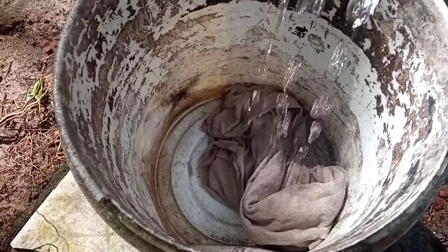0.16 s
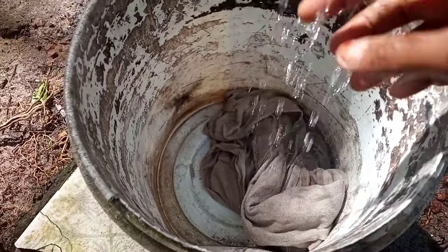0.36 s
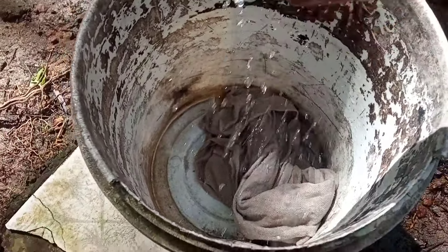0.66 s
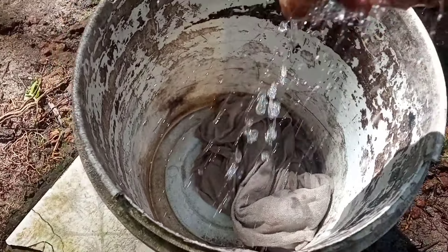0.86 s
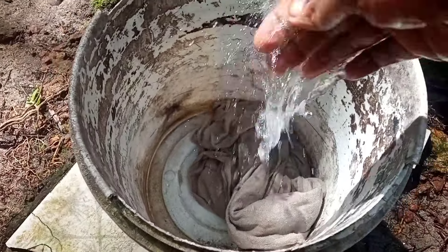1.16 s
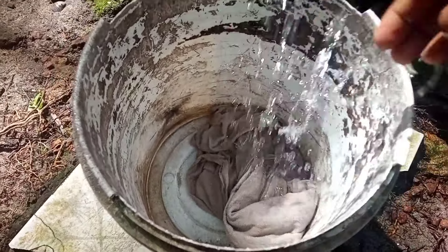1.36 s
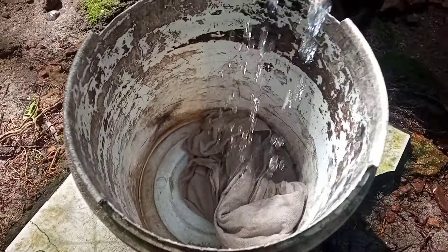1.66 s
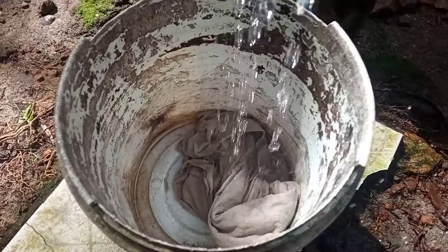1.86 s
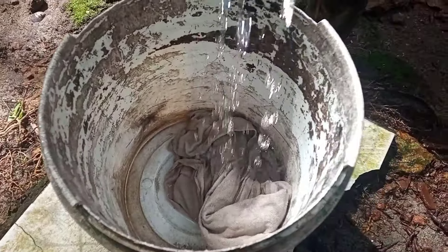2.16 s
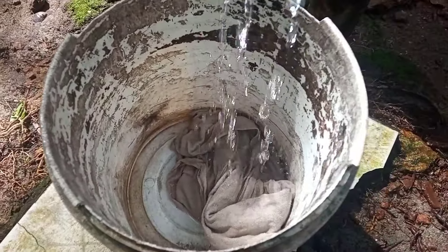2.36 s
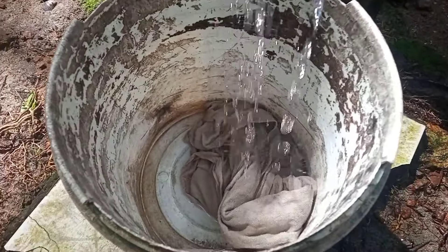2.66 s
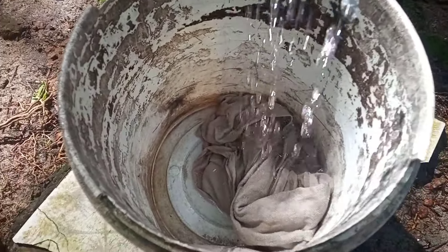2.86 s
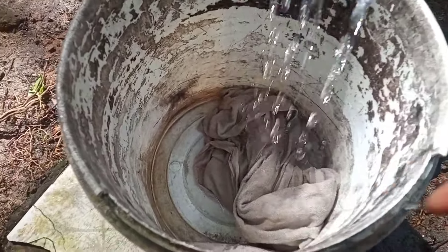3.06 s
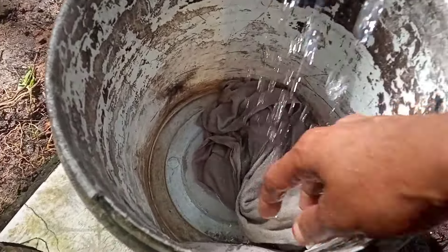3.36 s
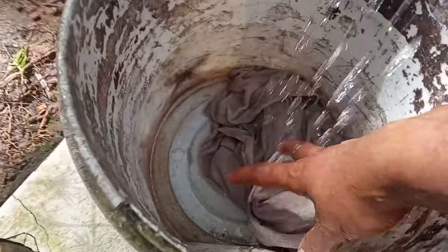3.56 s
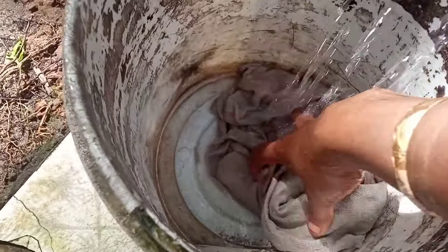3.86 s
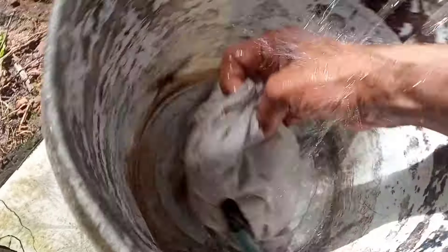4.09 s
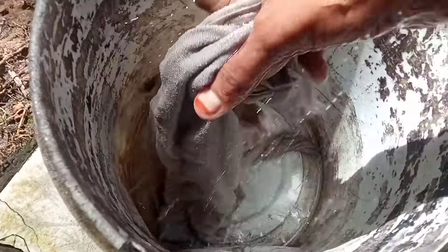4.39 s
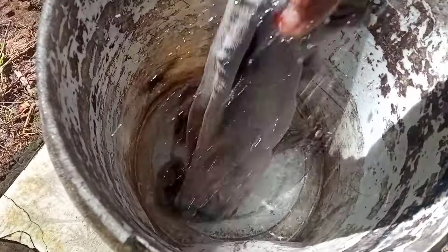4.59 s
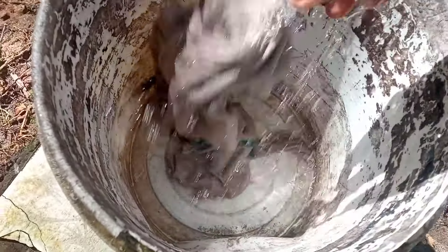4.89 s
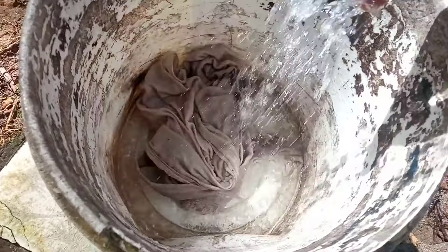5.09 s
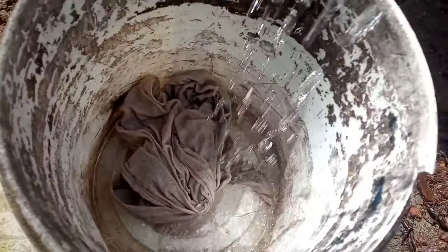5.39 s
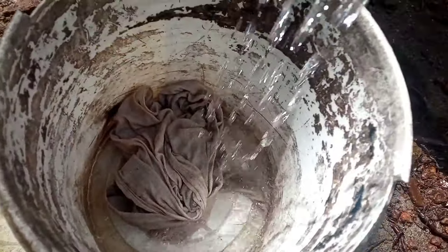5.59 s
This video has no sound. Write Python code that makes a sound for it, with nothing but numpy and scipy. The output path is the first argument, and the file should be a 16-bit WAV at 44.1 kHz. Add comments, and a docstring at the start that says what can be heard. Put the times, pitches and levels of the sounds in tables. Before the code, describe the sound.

Close bright water drops patter over cloth in a hollow bucket, briefly cut off, then wet smacks, thumps and sloshing, ending in gurgling splashes.

```python
"""Water falling on cloths in a metal bucket

A broken stream falls close by, outdoors: drops tick and spatter over a soft patter. A hand briefly cuts it,
then grabs and lifts the wet cloth, which slaps and makes the bucket's air boom. The cloth drops back and the
stream bubbles into the puddle. Tiny random impacts make the rain, rising notes the drops and bubbles,
short noise bursts the slaps and snaps; echoes and resonances make the bucket."""
import sys
import numpy as np
from scipy import signal
from scipy.fft import rfft, irfft
from scipy.io import wavfile
from scipy.ndimage import uniform_filter1d

SR = 44100
rng = np.random.default_rng(int(sys.argv[2]) if len(sys.argv) > 2 else 0)


def inscribe(sig):
    """Save sig as 16-bit PCM at rate SR to the path in sys.argv[1].

    A 1-D sig is mono; a 2-D sig holds one channel per row.
    Samples are clipped to [-1, 1] before scaling.
    """
    pcm = np.round(np.clip(np.atleast_2d(sig).T, -1, 1) * 32767)
    wavfile.write(sys.argv[1], SR, pcm.astype(np.int16))


N = 253134
USUAL_FLOW_DB = -49   # the flow that all changes of the stream are counted from


def from_db(db):
    """Turn decibels into a factor."""
    return 10 ** (np.asarray(db) / 20)


def rms_one(x):
    """Scale to an average strength (rms) of 1."""
    return x / np.sqrt(np.mean(x ** 2) + 1e-20)


def evened(x, size=2600):
    """Hold the running rms near 1 while the single grains stay; size is in samples."""
    power = uniform_filter1d(uniform_filter1d(x ** 2, size), size // 2)
    return x / np.sqrt(np.maximum(power, 0) + 1e-3 * np.mean(x ** 2))


def in_time(rows):
    """Join (seconds, dB) points by straight lines, giving a level at every sample."""
    s, db = np.transpose(rows)
    return np.interp(np.arange(N) / SR, s, db)


def swells(rows):
    """Sum of smooth humps, from rows of (middle in s, length at half height in s, height)."""
    t = np.arange(N) / SR
    return sum(height * np.cos(np.pi / 2 * np.clip((t - s) / length, -1, 1)) ** 2
               for s, length, height in rows)


def loudness_swells(rows):
    """Humps whose heights are given in dB."""
    return swells([(s, length, from_db(db)) for s, length, db in rows])


def drift(rate):
    """Slow random wandering with spread 1: smoothed noise, made at every 40th sample and joined by lines."""
    step = 40
    r = np.exp(-2 * np.pi * rate * step / SR)
    noise = rng.standard_normal(N // step + 2002)
    slow = signal.lfilter([1], [1, -2 * r, r * r], noise)[2000:]   # leave out the filter's start
    return np.interp(np.arange(N) / step, np.arange(len(slow)), rms_one(slow))


def coloured(x, spectrum):
    """Filter that follows a spectrum of (Hz, dB) points and answers each impact without delay."""
    size = 4096
    hz, db = np.transpose(spectrum)
    bins_hz = np.fft.rfftfreq(size, 1 / SR)
    gain = from_db(np.interp(np.log(bins_hz + 1), np.log(hz), db))
    # folding the cepstrum forward in time gives the minimum-phase filter
    cepstrum = irfft(np.log(gain))
    cepstrum[1:size // 2] *= 2
    cepstrum[size // 2 + 1:] = 0
    return signal.oaconvolve(x, irfft(np.exp(rfft(cepstrum))))[:N]


def resonance(x, hz, width_hz):
    """Two-pole resonance with gain 1 on top."""
    r = np.exp(-np.pi * width_hz / SR)
    forward = np.array([1, 0, -1]) * (1 - r * r) / 2
    feedback = [1, -2 * r * np.cos(2 * np.pi * hz / SR), r * r]
    return signal.lfilter(forward, feedback, x + 1e-18)


def band_noise(low_hz, high_hz, size):
    """Noise between two edges, rms 1."""
    band = signal.butter(2, [low_hz, high_hz], "band", fs=SR, output="sos")
    return rms_one(signal.sosfilt(band, rng.standard_normal(size)))


def hiss(hz, width_hz):
    """Smoothly flowing water: a soft band of noise, rms 1."""
    once = resonance(rng.standard_normal(N), hz, width_hz)
    return rms_one(resonance(once, hz, width_hz))


def add(out, s, sound):
    """Mix a sound in from time s on."""
    i = int(np.clip(s * SR, 0, N - 1))
    out[i:i + len(sound)] += sound[:N - i]


def impacts(per_s, spread_db, clump_db):
    """Random tiny impacts, many weak and a few strong, arriving in clumps as the stream breaks up."""
    sizes = from_db(spread_db * np.minimum(rng.exponential(1, N), 4)) * rng.choice([-1, 1], N)
    happens = rng.random(N) < per_s / SR
    return sizes * happens * from_db(clump_db * drift(114))


def chirp(hz, swell, glide):
    """A bubble's note: loudest, at height 1, after swell seconds; rises in pitch as it nears the surface."""
    u = np.arange(int(4 * swell * SR) + 2) / (swell * SR)
    pitch = hz * (1 + glide * np.tanh(u - 1))
    envelope = (u * np.exp(1 - u)) ** 5
    return envelope * np.sin(2 * np.pi * (np.cumsum(pitch) / SR + rng.random()))


def bubble_swarm(per_s, low_hz, high_hz, cycles, glide, spread_db):
    """Small bubbles at random times, with pitches spread between two limits."""
    out = np.zeros(N)
    for when, pitch, size in rng.random((int(per_s * N / SR), 3)):
        hz = low_hz * (high_hz / low_hz) ** pitch
        loudness = from_db(-spread_db * np.log(size + .02))
        add(out, when * N / SR, loudness * chirp(hz, cycles / hz, glide))
    return evened(out)


def controls():
    """The flow in dB as it reaches spray, bottom and puddle, with its brief changes and obstacles."""
    # Strength of the stream, as its fine spray. Each row: time in seconds, level in dB.
    flow_curve = [(0, -49.5), (1.8, -50.5), (2.8, -47), (3.25, -46.5), (3.5, -44), (4.1, -46.5),
                  (4.85, -51), (5.25, -44), (5.74, -45.5)]
    # Gurgle of the puddle that gathers and is laid bare. Each row: time in seconds, level in dB.
    puddle_curve = [(0, -56.5), (2.4, -61), (3.15, -57.5), (3.7, -55.5), (3.93, -47.5), (4.3, -49),
                    (5.05, -51), (5.3, -50), (5.74, -47)]
    # The stream breaks off, or a hand or the lifted cloth gets in its way. Each row: start in seconds,
    # end in seconds, loss of spray in dB, loss at the bottom in dB, loss of gurgle in dB (minus is a gain).
    blocks = [(0.567, 0.87, 0, 14, 6), (0.926, 1.094, 15.5, 25, 12), (1.112, 1.24, 2.5, 15, 3.5),
              (1.826, 1.885, 3.5, 0, 4), (2.322, 2.34, 8, 4, 0), (2.52, 2.554, 13, 2, 17),
              (2.98, 3.02, 0, 2.5, 2), (3.064, 3.1, 4.5, 0.5, 3), (3.745, 3.826, 11, 12, -10.5),
              (4.222, 4.541, 13, 18, 11), (4.53, 4.678, 2, 15.5, 11), (4.697, 4.803, 13, 12, 19),
              (5.034, 5.098, 4, 4.5, 2)]
    # The stream briefly swells or weakens. Each row: middle in seconds, length in seconds,
    # change in dB (minus is a loss).
    brief_changes = [(.89, 0.019, -2), (1.41, 0.11, 3.5), (4.968, 0.06, 10.5)]
    edge_s, surge_db, surge_rate = 0.036, 2, 14.6   # the stream wanders and pulses, some times a second
    t = np.arange(N) / SR
    surge = surge_db * np.clip(drift(surge_rate), -2, 2)
    change = np.zeros((3, N)) + swells(brief_changes) + surge
    for start, end, *losses in blocks:
        inside = np.clip(np.minimum(t - start, end - t) / edge_s + .5, 0, 1)
        change -= np.outer(losses, inside)
    spray_change_db, bottom_change_db, gurgle_change_db = change
    flow_db = in_time(flow_curve) - USUAL_FLOW_DB
    return flow_db, in_time(puddle_curve) + gurgle_change_db, spray_change_db, bottom_change_db


def stream(flow_db, gurgle_db, spray_change_db, bottom_change_db):
    """Each part of the stream is a rain of tiny impacts; all but the patter add the small bubbles they trap."""
    # Colours of spray, patter on cloth, gurgle and splatter. Each row: frequency in Hz, level in dB per Hz.
    spray_colour = [(300, -80), (2000, -32), (3500, -9.5), (4700, -4.5), (6600, -0.5), (8500, 0),
                    (10500, -8), (13000, -11), (16000, -10)]
    patter_colour = [(40, -14.5), (80, -22), (120, -13.5), (170, -23.5), (300, 0), (370, -4), (520, 2.5),
                     (750, -5.5), (1200, -10.5), (2400, -30.5)]
    gurgle_colour = [(200, -57), (480, -11.5), (720, 3.5), (950, -2), (1300, 2), (1700, -4.5), (2300, -6.5),
                     (4000, -20.5), (12000, -50)]
    splatter_colour = [(300, -49), (1100, -11.5), (2100, 0), (2700, -0.5), (3400, 7), (4300, -0.5),
                       (6000, -1), (10000, -9), (16000, -24)]
    # Splatter off the wet wall. Each row: time in seconds, level in dB.
    wall_curve = [(0, -62.5), (2.5, -61.5), (3.2, -51.5), (3.55, -47.5), (4.3, -53.5), (4.9, -53.5),
                  (5.4, -51), (5.74, -42.5)]
    # Water splatters off the hand. Each row: middle in seconds, length in seconds, level in dB.
    hand_splatters = [(0.594, 0.03, -47), (0.683, 0.03, -42.5), (.755, .04, -52), (1.413, 0.031, -50),
                      (3.44, 0.036, -50), (5.23, 0.11, -48)]
    usual_patter_db, patter_follows = -56, 0.36   # at the usual flow; share of the flow's swing

    spray_db = USUAL_FLOW_DB + flow_db + spray_change_db
    patter_db = usual_patter_db + patter_follows * flow_db + bottom_change_db
    splatter = from_db(in_time(wall_curve) + spray_change_db) + loudness_swells(hand_splatters)
    blobs = from_db(4.0 * np.clip(drift(65), -2, 2))   # the stream arrives in separate blobs

    ticks = evened(coloured(blobs * impacts(per_s=6500, spread_db=7.0, clump_db=2.0), spray_colour))
    fizz = bubble_swarm(per_s=480, low_hz=4660, high_hz=7700, cycles=5.5, glide=0.14, spread_db=4.5)
    prickle = bubble_swarm(per_s=400, low_hz=8180, high_hz=13860, cycles=6.6, glide=0.068, spread_db=10.5)
    spray = (from_db(-1.5) * ticks + from_db(-1.7) * evened(blobs * fizz)
             + from_db(-7.5) * evened(blobs * prickle))

    patter = evened(coloured(impacts(per_s=2500, spread_db=3.0, clump_db=3.5), patter_colour))

    churn_hits = np.sqrt(blobs) * impacts(per_s=2500, spread_db=3.0, clump_db=4.5)
    churn = evened(coloured(churn_hits, gurgle_colour))
    bubbles = bubble_swarm(per_s=200, low_hz=736, high_hz=1930, cycles=3.94, glide=0.13, spread_db=5.5)
    gurgle = from_db(-2.5) * churn + from_db(-6.5) * bubbles

    splats = evened(coloured(blobs * impacts(per_s=2500, spread_db=4.5, clump_db=6.0), splatter_colour))
    plinks = bubble_swarm(per_s=220, low_hz=2117, high_hz=4450, cycles=6.6, glide=0.14, spread_db=1.5)
    splashes = from_db(-3.5) * splats + from_db(-5.5) * evened(blobs * plinks)
    return (from_db(spray_db) * spray + from_db(patter_db) * patter
            + from_db(gurgle_db) * gurgle + splatter * splashes)


def drops(rows, cycles=2.9, crack_db=-12.5):
    """Each drop gives a sharp crack and a tick a few cycles long, in a little burst of smaller droplets."""
    # The crack of a drop. Each row: frequency in Hz, level in dB per Hz.
    crack_colour = [(100, -25), (500, -38), (2000, -18), (8000, 7), (12000, -6.5), (16000, -8)]
    glide, hardening, typical_db = 0.14, 0.39, -26
    count, spatter_s, lead_s, scatter, spatter_db = 6, .0012, .0014, 0.28, -9.0
    out, cracks = np.zeros(N), np.zeros(N)
    for s, db, hz, rest_db in rows:
        swell = cycles / hz
        add(out, s - swell, from_db(db) * chirp(hz, swell, glide))
        hard_db = db + crack_db + hardening * (db - typical_db)   # fast drops crack out of proportion
        add(cracks, s, from_db(hard_db) * rms_one(rng.standard_normal(16)) * np.hanning(16))
        lateness = rng.gamma(2, spatter_s, count)
        detunings = rng.normal(0, scatter, count)
        for late, detune in zip(lateness, detunings):
            droplet = chirp(min(hz * np.exp(detune), SR / 5), swell, glide)
            add(out, s - lead_s + late, from_db(db + rest_db + spatter_db) * droplet)
    return out + coloured(cracks, crack_colour)


def loudest_drops():
    """The drops that stand out, each at its own time."""
    # Each row: time in seconds, peak of the tick in dB, pitch in Hz, spatter against the drop in dB
    # (before the trim that all spatter shares).
    loud_rows = [(0.1235, -31, 7350, 6.5), (0.1858, -20, 5800, -14), (0.3103, -24.5, 5900, -2),
                 (0.3863, -32, 5940, 4), (0.4725, -13, 5710, -2), (0.48, -27, 6400, -8),
                 (0.4945, -23, 6800, -6), (0.5378, -20.5, 6100, -5), (0.613, -21.5, 8800, -14),
                 (0.6466, -25, 7400, -7), (0.702, -27, 6800, 0), (0.7146, -27, 5700, -10),
                 (0.7662, -28.5, 3420, -14), (0.7868, -33, 5300, -6), (0.81, -24.5, 6000, 2),
                 (0.8348, -37, 5200, 3), (0.8737, -17, 5660, -5), (0.8795, -28, 5400, -10),
                 (0.901, -27, 5900, -8), (0.9047, -23, 6040, -15), (0.9232, -33, 5800, -10),
                 (0.9305, -30, 5300, -13), (0.947, -23.5, 5530, 1), (0.968, -47, 4200, -6),
                 (0.982, -32.5, 7900, -3), (0.993, -45, 4200, -4), (1.02, -50, 3400, -4),
                 (1.049, -49, 5200, -6), (1.1094, -35.5, 3430, 4), (1.151, -43, 2630, -4),
                 (1.1788, -36.5, 5270, 12.5), (1.2662, -19.5, 6150, -20), (1.3787, -17.5, 7340, 6),
                 (1.4107, -30, 7800, 9), (1.4288, -25.5, 7950, 9.5), (1.4788, -32, 7060, 12.5),
                 (1.6196, -25.5, 7600, 4), (1.6819, -23, 6800, -2), (1.736, -21, 6460, -12),
                 (1.758, -31.5, 5150, 1.5), (1.8019, -17.5, 6300, -2.5), (1.899, -27.5, 6200, 1),
                 (1.9336, -22.5, 6460, -3.5), (1.995, -30, 6400, -1), (2.011, -29, 6960, -12),
                 (2.026, -33, 5530, 8), (2.08, -30, 4870, 3), (2.095, -24, 6170, 2.5),
                 (2.145, -15, 6560, -10), (2.1852, -15.5, 5830, -30), (2.2786, -19.5, 5600, -5),
                 (2.3112, -20, 5730, -1), (2.415, -20.5, 6860, -19), (2.4716, -24, 5670, -15),
                 (2.553, -28, 7260, -10), (2.5747, -27, 6900, -6), (2.6077, -21, 6450, -22),
                 (2.613, -35, 6400, -7), (2.6263, -22.5, 5900, -5), (2.651, -31, 4970, 2),
                 (2.6949, -17.5, 5500, -2.5), (2.7522, -19.5, 6630, -10), (2.8293, -18, 7200, -16),
                 (2.8485, -21, 6100, -5), (2.856, -15.5, 6000, -8), (2.865, -26, 5500, 3),
                 (2.8755, -21, 6400, -10), (2.8868, -14, 6600, -2.5), (2.9114, -25, 4740, 1),
                 (2.9393, -13, 6600, -3.5), (3.0261, -12, 7050, -11), (3.1366, -15, 5600, -1),
                 (3.1743, -18, 7550, -6), (3.1922, -25.5, 3280, -3.5), (3.2506, -20.5, 6060, -1),
                 (3.2924, -27, 4840, 1), (3.3429, -28, 5730, 1), (3.3788, -22.5, 6930, -6),
                 (3.3946, -25, 5400, -14), (3.4195, -22, 7660, 7), (3.458, -32, 3600, 6),
                 (3.476, -30, 4450, 0), (3.489, -30, 4000, 0), (3.5131, -18.5, 6340, -11),
                 (3.5443, -25, 5300, 10), (3.56, -19, 6530, -9), (3.58, -25, 6740, -2),
                 (3.6265, -18.5, 6200, 1.5), (3.8327, -20.5, 6800, -3), (3.89, -24.5, 3700, -12),
                 (3.8976, -19.5, 6500, -6), (3.9408, -21, 6800, -3), (4.003, -28, 3920, 4),
                 (4.0065, -22, 6200, 6.5), (4.013, -24, 7160, 6), (4.0523, -22.5, 6450, 4),
                 (4.1649, -27.5, 6130, 9.5), (4.2017, -27.5, 3800, 5.5), (4.266, -40, 8600, -6),
                 (4.39, -41, 5600, 0), (4.453, -38, 4900, -8), (4.472, -38, 7450, 11),
                 (4.514, -30, 6260, 1), (4.61, -22.5, 9530, -19), (4.6723, -13, 5680, -10.5),
                 (4.9588, -21.5, 4400, -6), (4.9872, -20.5, 6550, -5), (5.1536, -21.5, 6400, -10),
                 (5.2106, -25.5, 4500, 11.5), (5.2535, -27, 4300, 8), (5.2637, -20, 6440, -3),
                 (5.286, -35, 3650, 11), (5.3257, -23, 4150, 0), (5.3704, -22, 3940, -3),
                 (5.4137, -20, 8140, -6), (5.4414, -19.5, 5960, -3), (5.51, -30.5, 3700, -2),
                 (5.5567, -21.5, 5710, -1), (5.603, -28, 4640, 5), (5.645, -31, 3560, 6),
                 (5.6932, -20, 8200, -17)]
    return drops(loud_rows)


def lesser_drops(spray_db):
    """The stream sheds smaller drops at uneven intervals, as strong as the flow allows."""
    per_s, usual_db, spread_db, follows = 30, -34.5, 2, 0.9
    usual_hz, spread_octaves, spatter_db, spatter_spread_db = 6490, 0.28, 0.5, 1.5
    count = int(per_s * N / SR)
    chance = rng.standard_normal((count, 4))
    s = np.clip((np.arange(count) + .5 + chance[:, 0]) / per_s, 0, (N - 1) / SR)
    db = usual_db + follows * spray_db[(s * SR).astype(int)] + spread_db * chance[:, 1]
    hz = usual_hz * 2 ** (spread_octaves * chance[:, 2])
    rest_db = spatter_db + spatter_spread_db * chance[:, 3]
    # slow drops ring a little longer
    return drops(np.transpose([s, db, hz, rest_db]), cycles=3.4, crack_db=-10)


def slaps():
    """Wet cloth smacks and squelches, thumps the bucket's air, churns the water and thuds on the bottom."""
    # Each row: start in seconds, slap level in dB, slap decay in seconds, brightness (top edge) in Hz,
    # thump level in dB, thump pitch in Hz. Both levels get a small common trim below.
    slap_rows = [(.875, -50, 0.018, 1110, -40.5, 283), (2.078, -35.5, 0.0059, 2900, -49, 286),
                 (2.902, -36.5, 0.0043, 2570, -42, 360), (3.189, -39, 0.0022, 3070, -40, 330),
                 (3.421, -43.5, 0.049, 2030, -32, 326), (3.444, -40, 0.018, 2150, -22.5, 343),
                 (3.6247, -30.5, 0.0077, 4200, -44, 293), (3.652, -30, .005, 4600, -50, 300),
                 (3.6853, -20, 0.005, 2700, -28, 342), (3.7079, -18.5, 0.0055, 3620, -21.5, 306),
                 (3.7696, -13, 0.0051, 3970, -17, 288), (3.8045, -36, 0.016, 1500, -21, 268),
                 (4.095, -31.5, 0.033, 1320, -14, 229), (4.106, -27.5, 0.011, 2440, -18, 285),
                 (4.126, -24, 0.013, 1600, -28, 248), (4.146, -41, .016, 1600, -24.5, 282),
                 (4.183, -39.5, 0.012, 2020, -30, 272), (4.216, -61, 0.0076, 2000, -41, 274),
                 (4.945, -36, 0.0047, 2470, -38, 297), (4.962, -33, 0.013, 1470, -37, 327),
                 (4.988, -32, 0.0095, 2170, -35, 327), (5.325, -34.5, 0.0043, 3600, -52, 298),
                 (5.368, -35, .004, 3600, -52, 302), (5.412, -31, 0.0032, 3000, -34, 251),
                 (5.507, -36, .004, 3000, -50, 304), (5.642, -28.5, 0.0047, 3200, -43, 304),
                 (5.696, -37.5, 0.012, 3020, -40.5, 275)]
    low_hz, rise_s, squeeze, slap_trim_db = 600, 0.00063, 1.65, -0.9
    thump_s, thump_rise_s, thump_lag_s, thump_trim_db = 0.0091, 0.0035, .0015, 0.76
    churn_db, churn_s, thud_db, thud_s = -12.0, 0.015, -29, 0.032
    squelch_db, squelch_s = -22, 0.012   # level against the slap
    out, squelches, t = np.zeros(N), np.zeros(N), np.arange(SR // 5) / SR
    for s, db, decay, bright_hz, push_db, hz in slap_rows:
        smack = band_noise(low_hz, max(bright_hz, 2 * low_hz), len(t))
        smack *= np.exp(-(t / decay) ** squeeze) * (1 - np.exp(-t / rise_s))
        air = np.sin(2 * np.pi * hz * t) * np.exp(-t / thump_s)
        churn = from_db(churn_db) * band_noise(0.68 * hz, 1.62 * hz, len(t)) * np.exp(-t / churn_s)
        thud = from_db(thud_db) * band_noise(58, 236, len(t)) * np.exp(-t / thud_s)
        thump = (air + churn + thud) * (1 - np.exp(-t / thump_rise_s))
        squelch = band_noise(450, 2200, len(t)) * np.exp(-t / squelch_s)
        add(out, s, from_db(db + slap_trim_db) * smack)
        add(out, s + thump_lag_s, from_db(push_db + thump_trim_db) * thump)
        add(squelches, s + decay, from_db(db + squelch_db) * squelch)
    ragged = from_db(3 * np.clip(drift(190), -2, 2))
    return out + squelches * ragged


def large_bubbles():
    """Water knocks into the puddle and traps air, which rings at once, dies away and rises in pitch."""
    # The largest bubbles. Each row: time in seconds, peak in dB (before a small common trim), pitch in Hz,
    # length in seconds (scales decay and glide), rise in pitch as a share.
    bubble_rows = [(.387, -30, 4520, 0.00247, .06), (0.593, -33.5, 2630, 0.002, .2),
                   (.649, -37, 2630, 0.0022, .15), (.69, -48, 920, .004, 0.087),
                   (.704, -37.5, 2250, 0.0026, .15), (.729, -39, 3040, 0.0027, .1),
                   (0.742, -33, 2900, .002, 0.14), (0.835, -31.5, 2670, 0.0012, 0.2),
                   (1.111, -48.5, 1060, 0.0069, .05), (1.325, -45, 597, 0.0057, .2),
                   (1.391, -35.5, 3130, .003, 0.16), (1.9, -41, 890, 0.0026, .2),
                   (1.904, -42.5, 550, .004, .2), (2.149, -42, 620, 0.0038, .2),
                   (2.473, -48, 1330, 0.0028, .1), (2.59, -44, 597, .004, .2),
                   (2.906, -37.5, 560, .004, 0.23), (2.961, -26.5, 3370, 0.002, 0.22),
                   (3.196, -36.5, 787, 0.012, 0.026), (3.373, -33.5, 1190, 0.0045, 0.18),
                   (3.388, -47, 1420, .005, .1), (3.631, -32, 1285, 0.0042, .1),
                   (3.893, -39, 1160, .004, .15), (3.913, -36, 1020, .005, .05),
                   (3.937, -32.5, 850, 0.0041, 0.16), (3.96, -31.5, 1000, 0.0032, .2),
                   (4.012, -32.5, 544, 0.0057, 0.13), (4.104, -20.5, 520, 0.0038, .15),
                   (4.138, -27, 750, 0.0064, 0.038), (4.202, -29, 1230, 0.00296, 0.11),
                   (4.255, -45, 1690, 0.0029, .1), (4.286, -48, 1250, 0.0028, .15),
                   (4.349, -46.5, 704, 0.0063, 0.081), (4.426, -48, 1600, 0.0019, .1),
                   (4.437, -43.5, 1050, 0.002, .2), (4.571, -35.5, 2700, 0.0028, 0.3),
                   (4.855, -37, 950, 0.0042, .2), (4.956, -29.5, 1210, 0.0034, .2),
                   (5.039, -36, 1290, 0.0033, .1), (5.127, -33, 3080, 0.0019, 0.15),
                   (5.178, -34.5, 920, 0.0042, 0.16), (5.196, -36.5, 1120, 0.00705, .05),
                   (5.231, -34, 3300, .0025, .1), (5.304, -32, 1320, 0.0028, 0.32),
                   (5.353, -43, 1550, 0.0027, .1), (5.37, -41, 860, 0.0032, .1),
                   (5.414, -32, 1310, 0.0044, .08), (5.42, -36.5, 604, 0.0027, 0.11),
                   (5.43, -32.5, 1160, 0.0019, .15), (5.447, -35, 1160, 0.0018, 0.16),
                   (5.467, -37, 3030, .003, .08), (5.512, -39, 960, 0.0039, .2),
                   (5.54, -33.5, 1260, 0.0075, .08), (5.577, -33, 1190, .004, 0.22),
                   (5.602, -23, 3500, 0.0023, 0.097), (5.632, -34, 1390, .003, .1),
                   (5.644, -33, 850, 0.0018, 0.12), (5.659, -25, 3050, .002, 0.17),
                   (5.667, -31, 2930, .003, .08), (5.696, -34.5, 650, 0.0021, .15),
                   (5.705, -34, 1110, 0.0021, .15), (5.706, -31, 3000, 0.0022, .1)]
    pinch_cycles, ring, entry_db, entry_s = 1.06, 0.8, -10, 0.0023
    out, t = np.zeros(N), np.arange(SR // 16) / SR
    for s, db, hz, length, glide in bubble_rows:
        pitch = hz * (1 + glide * np.tanh(t / length / 3 - .25))
        envelope = (1 - np.exp(-t * hz / pinch_cycles)) * np.exp(-t / (ring * length))
        tone = np.sin(2 * np.pi * (np.cumsum(pitch) / SR + rng.random()))
        note = envelope / envelope.max() * tone
        entry = from_db(entry_db) * band_noise(0.38 * hz, 1.75 * hz, len(t)) * np.exp(-t / entry_s)
        add(out, s - length / 2, from_db(db) * (note + entry))
    return from_db(0.5) * out


def hollow(flow_db, bottom_change_db):
    """Water and moving cloth make the bucket's air boom; the stream drums on the bottom, more through
    soaked cloth."""
    # Moving cloth stirs the air. Each row: middle in seconds, length in seconds, level in dB.
    stirs = [(0.903, 0.04, -59), (3.846, 0.64, -50.5), (4.184, 0.083, -45.5), (4.433, 0.13, -59),
             (4.725, 0.075, -52.5), (4.945, 0.14, -54)]
    boom_dry_db, boom_soaked_db, boom_follows = -69.5, -63.5, 0.87   # follows: share of the flow's swing
    drum_dry_db, drum_soaked_db = -75, -64.5
    soak_from_s, soak_to_s = 1.5, 2.03
    soaked = np.clip((np.arange(N) / SR - soak_from_s) / (soak_to_s - soak_from_s), 0, 1)
    boom_db = boom_dry_db + soaked * (boom_soaked_db - boom_dry_db)
    boom_db = boom_db + boom_follows * flow_db + bottom_change_db
    drum_db = drum_dry_db + soaked * (drum_soaked_db - drum_dry_db) + np.minimum(bottom_change_db, 0)
    boom_hits = impacts(per_s=900, spread_db=4.0, clump_db=3.5)
    boom = resonance(resonance(boom_hits, 282, 105), 227, 117)
    drum_hits = impacts(per_s=490, spread_db=4.5, clump_db=6.5)
    drum = resonance(resonance(drum_hits, 104.0, 40), 103, 120)
    boom_level = np.hypot(from_db(boom_db), loudness_swells(stirs))
    return boom_level * evened(boom) + from_db(drum_db) * evened(drum)


def slosh():
    """Water pressed through the cloth breaks into tiny splashes, so many that they merge into a wash."""
    # Water sloshes through the moving cloth. Each row: middle in seconds, length in seconds, level in dB.
    slosh_rows = [(3.454, 0.029, -44), (3.799, 0.028, -40), (3.938, 0.054, -46), (4.049, 0.014, -43.5),
                  (4.118, 0.024, -42), (4.955, 0.043, -40), (5.19, 0.042, -54)]
    # Colour of the wash. Each row: frequency in Hz, level in dB per Hz.
    slosh_colour = [(250, -27), (500, 3), (850, 8), (1300, -4), (1900, -8), (2600, -6), (5000, -24)]
    wash = evened(coloured(impacts(per_s=12000, spread_db=1.5, clump_db=-0.5), slosh_colour))
    return loudness_swells(slosh_rows) * wash


def rustle():
    """Wet fibres stick and let go in a dense crackle."""
    # Cloth rustles under the fingers and drags along the wall. Each row: middle in seconds,
    # length in seconds, level in dB.
    rustle_rows = [(3.443, .033, -41), (3.761, 0.019, -37), (3.92, .05, -51), (4.245, 0.034, -56),
                   (4.397, .06, -63.5), (4.81, .011, -46.5), (4.943, .016, -41)]
    # Colour of the crackle. Each row: frequency in Hz, level in dB per Hz.
    rustle_colour = [(300, -22), (900, -2), (1700, 2), (3200, -1.5), (6000, -5), (10000, -14), (16000, -24)]
    crackle = evened(coloured(impacts(per_s=9000, spread_db=3.0, clump_db=1.5), rustle_colour))
    return loudness_swells(rustle_rows) * crackle


def hand_hits():
    """Fat drops smack on the hand; skin damps the blow at once, so it lasts little more than a cycle."""
    # Each row: time in seconds, peak in dB (before a small common trim), pitch in Hz.
    hit_rows = [(.5753, -24.5, 4270), (.5865, -26, 5800), (.7493, -19, 3100), (.818, -29, 3400),
                (0.8194, -18.5, 3950), (0.8353, -28, 2880)]
    cycles, glide, trim_db = 1.22, .1, 1
    out = np.zeros(N)
    for s, db, hz in hit_rows:
        add(out, s - cycles / hz, from_db(db + trim_db) * chirp(hz, cycles / hz, glide))
    return out


def snaps():
    """Fast droplets snap against the bare metal wall: each is a very short, bright burst."""
    # Each row: start in seconds, strength in dB (before a common trim and the colouring).
    snap_rows = [(0.0852, -32), (0.3626, -24), (0.8729, -32), (1.3763, -34), (1.4087, -28), (1.4282, -17),
                 (1.6606, -35), (1.7355, -34), (1.8013, -39), (1.8981, -34), (2.3755, -31), (2.6938, -29),
                 (2.9377, -28), (3.026, -27), (3.707, -22), (3.8317, -32), (4.0043, -30), (4.1624, -28),
                 (4.4742, -38), (4.6084, -33), (4.6713, -32), (4.9711, -27), (5.1367, -33), (5.225, -19),
                 (5.413, -24), (5.5553, -32), (5.6945, -24)]
    # Colour of a snap. Each row: frequency in Hz, level in dB per Hz.
    snap_colour = [(1000, -40), (5000, -14), (9000, -2), (12000, 3), (16000, 4)]
    decay_s, trim_db = 0.00051, -3.5
    out, t = np.zeros(N), np.arange(SR // 200) / SR
    for s, db in snap_rows:
        add(out, s, from_db(db + trim_db) * rng.standard_normal(len(t)) * np.exp(-t / decay_s))
    return coloured(out, snap_colour)


def bucket(x):
    """Sound bounces between the close walls for some milliseconds and rings in the air column."""
    # Resonances of the air in the bucket. Each row: frequency in Hz, width in Hz, level in dB
    # (before the common level of the ringing).
    cavity = [(185, 49, -3.5), (231, 52, -11), (293, 32, 0.5), (384, 29, -13), (450, 22, -9),
              (512, 50, -11.5), (844, 43, -4.5), (914, 24, -1.5), (1293, 77, -12), (1606, 125, -3),
              (1800, 67, -5.5), (2300, 33, -23), (2480, 14, -8), (2660, 43, -15), (2990, 45, -9),
              (3280, 81, -4)]
    echo_db, echo_s, first_echo_s, ring_db = -10, 0.002, 0.0011, -1
    t = np.arange(SR // 20) / SR
    bounces = rng.standard_normal(len(t)) * np.exp(-t / echo_s) * (t > first_echo_s)
    echoes = signal.oaconvolve(x, bounces / np.linalg.norm(bounces))[:N]
    ringing = sum(from_db(db) * resonance(x, hz, width) for hz, width, db in cavity)
    return x + from_db(echo_db) * echoes + from_db(ring_db) * ringing


def palm():
    """The stream hisses on the palm that catches it, for a moment around 1.03 s."""
    return loudness_swells([(1.03, 0.17, -65.5)]) * hiss(hz=1860, width_hz=520)


def tap():
    """The open tap gives a thin, steady hiss."""
    return from_db(-69.5) * hiss(hz=1727, width_hz=410)


def outdoors():
    """Faint outdoor air: steady coloured noise."""
    # Each row: frequency in Hz, level in dB per Hz (only the shape counts).
    air_colour = [(25, -8), (60, -10), (100, 6), (190, 0), (600, -23), (1300, -1), (2500, 1), (6000, 3),
                  (16000, -6.5)]
    return from_db(-65) * rms_one(coloured(rng.standard_normal(N), air_colour))


def scene():
    """Everything in the bucket, over the palm's and the tap's hiss and faint outdoor air."""
    flow_db, gurgle_db, spray_change_db, bottom_change_db = controls()
    water = stream(flow_db, gurgle_db, spray_change_db, bottom_change_db) + hollow(flow_db, bottom_change_db)
    falling = loudest_drops() + lesser_drops(flow_db + spray_change_db) + hand_hits() + snaps()
    cloth = slaps() + slosh() + rustle()
    inside = bucket(water + falling + cloth + large_bubbles())
    return (from_db(-2.0) * inside + palm() + tap() + outdoors())[None]


def record(dry):
    """The microphone thins the bass and has a sharp peak at the top of its range; above it sound is cut."""
    peak_hz, peak_width_hz, peak_db = 15250, 1300, 12
    bass_cut_hz, cutoff_hz = 42, 16000
    thin = signal.sosfilt(signal.butter(2, bass_cut_hz, "high", fs=SR, output="sos"), dry)
    peak = resonance(resonance(thin, peak_hz, peak_width_hz), peak_hz, peak_width_hz)
    bright = thin + from_db(peak_db) * peak
    return signal.sosfilt(signal.ellip(10, .2, 80, cutoff_hz, fs=SR, output="sos"), bright)


dry = scene()
out = record(dry)
inscribe(out)
```